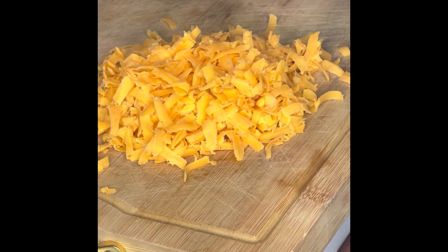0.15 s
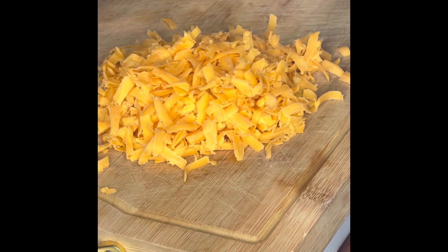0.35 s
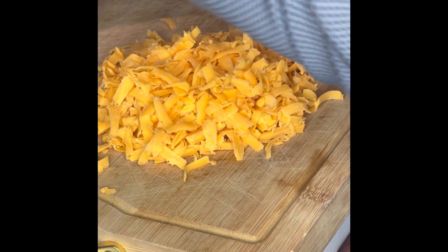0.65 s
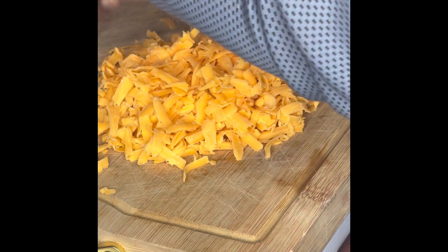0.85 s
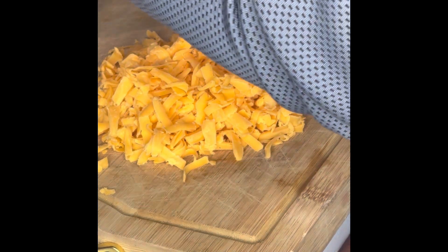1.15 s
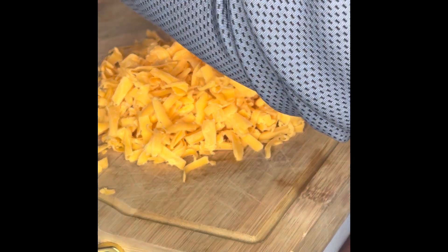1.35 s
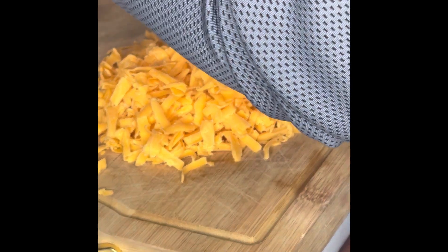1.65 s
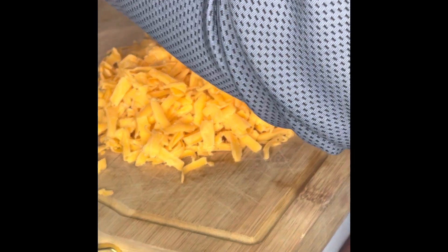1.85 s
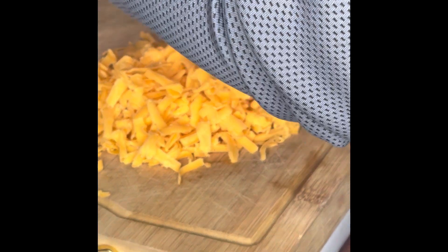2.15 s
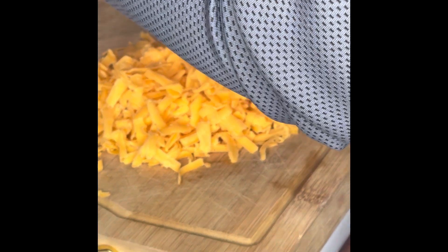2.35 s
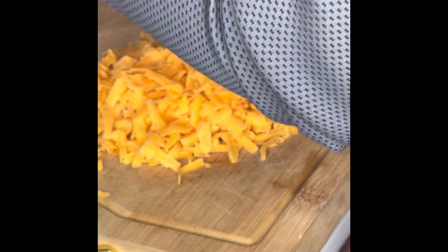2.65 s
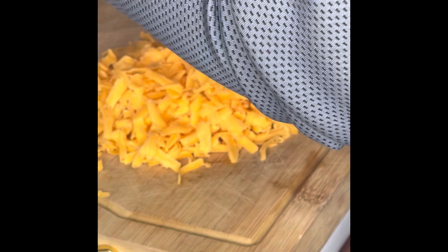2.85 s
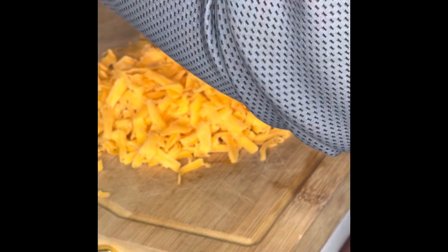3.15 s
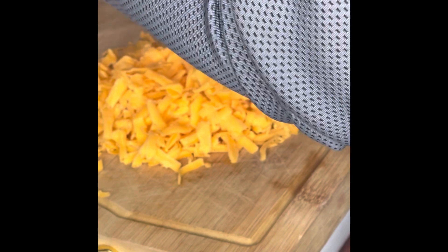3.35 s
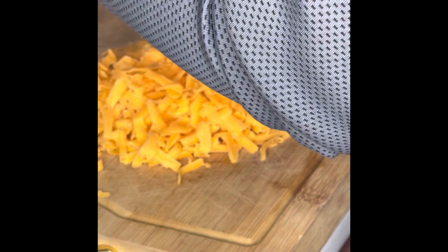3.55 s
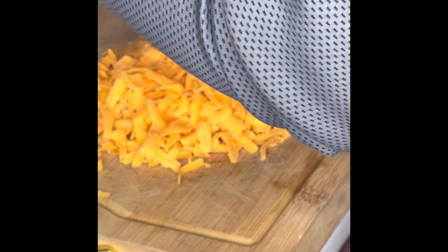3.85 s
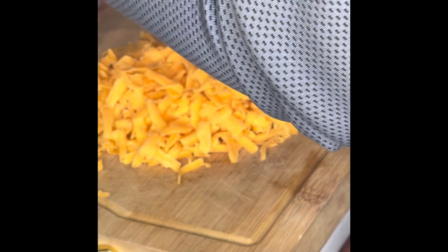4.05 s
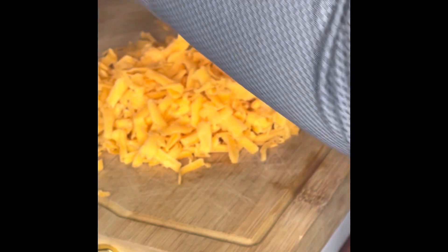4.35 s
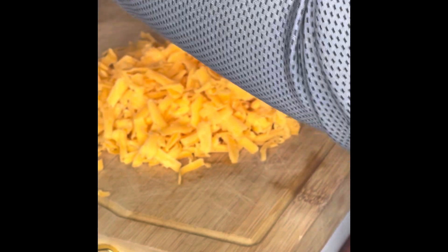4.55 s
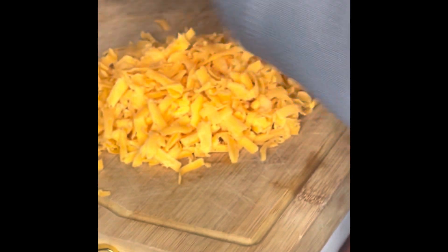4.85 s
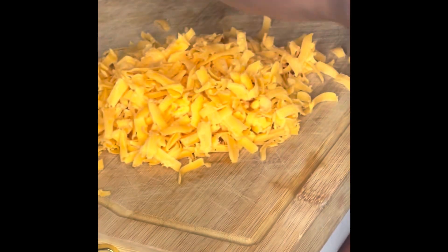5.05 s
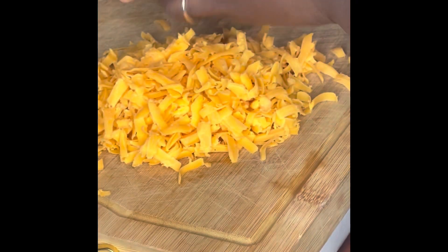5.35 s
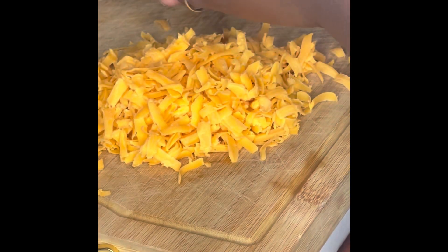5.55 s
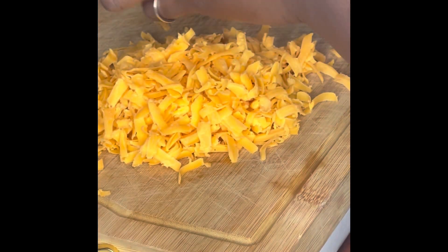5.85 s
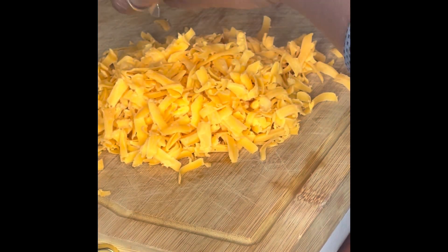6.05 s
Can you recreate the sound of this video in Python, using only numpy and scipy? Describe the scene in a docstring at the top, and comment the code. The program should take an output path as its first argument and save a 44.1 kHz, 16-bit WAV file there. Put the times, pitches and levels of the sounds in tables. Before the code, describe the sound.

Irregular dry scraping from a handheld metal grater, made of dense tearing grains and sharp little cracks. It starts busy, falls to sparse light ticks with dull board thumps around two seconds, picks up after four, and finishes with rapid bright rasps. Close phone microphone, centred direct sound, short diffuse kitchen echo to the sides, quiet low hum behind.

```python
"""Dense rasping grains and sharp snaps: cheese is pushed over a hand grater close to a phone.
Grains are band noise in random bursts under stroke envelopes; snaps are short cracks with a ring.
Taps on the hollow grater and knocks on the wooden board ring decaying modes. Behind them a low rumble
wavers and a fridge hums (wavering tones and shaped noise); the small kitchen adds a noise echo."""
import sys
import numpy as np
from scipy import signal
from scipy.fft import rfft, irfft, next_fast_len
from scipy.io import wavfile
from scipy.ndimage import uniform_filter1d

SR = 44100
rng = np.random.default_rng(int(sys.argv[2]) if len(sys.argv) > 2 else 0)


def materialize(psi):
    """Save the field psi as 16-bit PCM at rate SR to the path in sys.argv[1].

    A 1-D psi becomes a single channel; in a 2-D psi each row is a channel.
    """
    bounded = np.clip(np.atleast_2d(psi).T, -1, 1)
    quanta = np.round(bounded * 32767).astype(np.int16)
    wavfile.write(sys.argv[1], SR, quanta)


N = 273861

# strokes over the teeth: start t/s, length/s, level/dB, growth over the stroke/dB,
# body re level/dB, edge re level/dB
STROKES = [(-0.01, 0.12, -29.5, -11, -7.5, -3), (0.127, 0.37, -41, -13, -3, 1),
           (0.584, 0.15, -52.5, 9.5, -4, -9), (0.681, 0.047, -43, 2, -3.5, 2),
           (0.764, 0.26, -40.5, 1, -6, 3.5), (1.147, 0.061, -49.5, 4, -9, 1),
           (1.226, 0.14, -56.5, 2.5, 0, 13.5), (1.415, 0.018, -50.5, -4, -12, 8),
           (1.577, 0.032, -55, 1, -5.5, -6), (1.709, 0.036, -50.5, -26, 11.5, -8),
           (1.925, 0.037, -53, 10, 3.5, -2.5), (2.093, 0.066, -53.5, -5, 1, 0),
           (2.327, 0.025, -42, -4.5, -12.5, 6), (2.477, 0.073, -70, 5, 7, -4),
           (2.652, 0.079, -55.5, 5.5, -10, 2), (2.782, 0.054, -56, -5, -9, -9),
           (2.867, 0.024, -50.5, -5, -17, 5.5), (3.087, 0.1, -46, -12.5, -1.5, 5),
           (3.249, 0.06, -48, 4, -8.5, -8), (3.459, 0.036, -52, 11, -25, 1.5),
           (3.688, 0.14, -49.5, -9.5, -7, -10), (3.84, 0.077, -65.5, 5, -6, 7),
           (3.972, 0.19, -45, 3, -8, -1), (4.294, 0.095, -45, 7, -69, -5.5),
           (4.428, 0.26, -38.5, -28.5, -2.5, 3), (4.636, 0.14, -49.5, 4, -3, 3.5),
           (4.838, 0.059, -50.5, 0, -4, 6), (4.959, 0.09, -39.5, -7, -7, -0.5),
           (5.067, 0.13, -49.5, -9, 1, 1), (5.199, 0.23, -35.5, -12, -5.5, -5),
           (5.404, 0.3, -48, -6.5, -3, -18), (5.596, 0.14, -53.5, 16, -5.5, -1),
           (5.739, 0.049, -37, 8, -3.5, 2.5), (5.784, 0.089, -35, -4, -1, 2),
           (5.9, 0.031, -28.5, -11.5, -1.5, 3), (5.977, 0.031, -32.5, -5.5, -3.5, 3),
           (6.129, 0.13, -39.5, 5, -10, -2)]
BITE_S, RELEASE_DB_PER_S = 0.0054, 186  # quick bite, slower release
TICKS_DB, TICK_EDGE = -11, 0.99  # ticks re stroke level; share of the edge column they follow

# loudest snaps of the teeth: t/s, nominal peak level/dB, ring f/Hz, edge re ring/dB
SNAPS = [(0.0176, -17, 2960, -17), (0.035, -28, 2620, 1), (0.0574, -22.5, 3720, 8),
         (0.137, -17.5, 2370, 5.5), (0.1836, -26.5, 1980, -8), (0.219, -28, 5600, -1),
         (0.2345, -25, 2220, -6), (0.265, -19.5, 5630, 12), (0.2685, -17, 2890, 1.5),
         (0.2984, -25, 2110, -3), (0.313, -19, 2160, 6), (0.336, -14.5, 3700, 2.5),
         (0.369, -17.5, 3900, 13), (0.397, -24.5, 3400, 4), (0.4068, -24, 2280, 9), (0.595, -33, 2520, 2),
         (0.6077, -27, 3287, 14), (0.6406, -23.5, 2740, 1.5), (0.671, -29, 3020, 17),
         (0.686, -27.5, 2550, 9), (0.6965, -34, 3000, 12), (0.731, -26.5, 3600, -6), (0.773, -29, 2180, 7),
         (0.8112, -30, 3330, 3), (0.851, -25, 3600, -5), (0.8561, -15, 2380, 14), (0.865, -37, 2190, -34),
         (0.9, -22, 2450, 14), (0.9114, -18, 2370, 9), (0.917, -23, 5430, 10), (0.982, -34, 2900, 6),
         (1.0157, -12.5, 2160, 12), (1.039, -22, 5600, 7), (1.1742, -28, 4200, -10), (1.235, -27, 2280, 11),
         (1.33, -34, 5060, 10), (1.42, -22, 2970, 8.5), (1.5986, -31.5, 2420, 9), (1.7118, -26, 1960, 6.5),
         (1.736, -30, 3050, 17), (1.764, -18, 6140, 7.5), (1.921, -31, 5250, 4), (1.933, -31, 4500, 14),
         (1.948, -22.5, 3370, 28), (2.086, -31.5, 2020, 9), (2.1037, -22, 4900, 3), (2.115, -36, 3000, 7),
         (2.132, -30, 2560, 3), (2.197, -34.5, 1960, -3), (2.3301, -17.5, 4400, 11),
         (2.394, -32.5, 3550, 3), (2.498, -21.5, 5300, -2), (2.526, -23.5, 5200, -6),
         (2.552, -24.5, 2190, 12), (2.661, -25.5, 4660, 19), (2.693, -18, 1780, 14), (2.724, -26, 5700, -9),
         (2.7927, -29.5, 5200, -4), (2.877, -23.5, 5500, -2), (2.911, -31.5, 3530, 1),
         (2.9203, -26.5, 5600, -2), (3.0787, -33.5, 2980, -4), (3.0861, -17, 1850, 18.5),
         (3.134, -17, 3320, 5), (3.248, -26.5, 4530, -1.5), (3.2748, -24, 4650, -1),
         (3.436, -29.5, 3340, -8), (3.445, -25, 3280, 5), (3.463, -13, 2790, 3.5),
         (3.6337, -25.5, 4040, -2), (3.654, -39, 1490, -2), (3.686, -18.5, 2290, 3.5),
         (3.707, -30, 4100, -15), (3.817, -36.5, 2080, -2), (3.8366, -24.5, 5000, 4),
         (3.9876, -27, 2160, 4), (4.055, -29.5, 2520, 22), (4.0885, -23, 2420, 2.5),
         (4.165, -25.5, 3000, 13), (4.305, -23, 3500, -4.5), (4.35, -27.5, 4524, 0),
         (4.436, -16.5, 3150, 9), (4.516, -24, 4520, 30), (4.538, -21.5, 2260, 13), (4.71, -34, 3730, -7),
         (4.8768, -24, 5000, 5), (4.9573, -35, 1920, -8), (4.97, -23.5, 1990, -5),
         (4.9915, -22.5, 1640, -9), (5.007, -27, 3540, -2), (5.029, -28.5, 2060, 2),
         (5.091, -28.5, 4120, 2), (5.104, -29, 1450, -5), (5.176, -21.5, 1540, -27), (5.214, -17, 1610, 26),
         (5.2885, -20, 1670, 1), (5.302, -21, 2380, -3), (5.343, -17, 2700, 1.5), (5.346, -18, 2000, 10),
         (5.437, -28, 2570, 5), (5.505, -29, 2440, 0.5), (5.5523, -22.5, 3820, 1),
         (5.6067, -29.5, 3000, 15), (5.627, -27.5, 5500, 11), (5.634, -22, 2200, 5),
         (5.6669, -32, 2180, -1), (5.695, -16.5, 3350, 5.5), (5.713, -29, 3000, 4),
         (5.7213, -19.5, 2800, 3), (5.737, -39, 3000, 3), (5.7576, -20, 2400, -8), (5.7778, -18, 2300, 8),
         (5.7888, -16, 4200, -15), (5.825, -18, 2200, 16), (5.834, -25, 2520, 5), (5.846, -24, 4000, 9),
         (5.8584, -15, 1830, 3), (5.905, -22, 3200, 15), (5.915, -14, 3560, 0.5),
         (5.9675, -18.5, 4580, -14), (5.9981, -15.5, 2210, 9), (6.0508, -21.5, 4230, 17),
         (6.1287, -23.5, 2320, 10), (6.1757, -17, 3580, 11)]
SNAP_SIZE = 2048  # samples
SNAP_BODY_DB = -7.5  # broad body re ring
CREST_DB = 20  # nominal peak over rms of one snap
CRACK_S, RATTLE_S, RATTLE_DB = 0.001, 0.005, -12  # decay times; rattle re crack
STRIKE = 0.83  # first impulse re the noise that follows

SHEET_HZ, SHEET_WIDTH_HZ, SHEET_DB = 2395, 380, -11.5  # broad ring of the perforated sheet

# taps on the hollow grater: t/s, peak level/dB, contact length/s, brightness/(dB per octave)
TAPS = [(2.715, -36.5, 0.0029, -3.5), (4.02, -36.5, 0.0099, 2), (4.055, -32, 0.0049, 3.5),
        (4.435, -33, 0.032, 29), (4.912, -29.5, 0.0026, -2), (4.988, -27.5, 0.0044, 2.5),
        (5.09, -37, 0.11, 6), (5.145, -28.5, 0.018, 2), (5.162, -24, 0.0032, -1), (5.178, -21.5, 0.0039, 0),
        (5.208, -19.5, 0.004, 4), (5.265, -25.5, 0.0092, 3), (5.29, -35, 0.13, 13),
        (5.915, -19, 0.00058, 2.5), (5.998, -23, 0.0019, 0.5), (6.175, -31.5, 0.0038, 0.5)]
# modes of the hollow grater: f/Hz, relative level/dB, t60 without contact/s
GRATER_MODES = [(309, 3, 0.022), (594, 7, 0.0126), (688, 4.5, 0.0093), (804, -4, 0.0041),
                (1420, -13, 0.012), (1618, -4.5, 0.022), (1943, -10.5, 0.016), (2247, -9, 0.034)]
PITCH_SPREAD, TAP_ECHO_DB = 0.0516, -3.5  # random relative pitch spread from tap to tap; gain into echo

# knocks on the board: t/s, peak level/dB, contact length/s, brightness/(dB per octave)
KNOCKS = [(.665, -31, 0.15, 9), (.695, -19.5, 0.0021, -8.5), (1.24, -31.5, 0.052, -7),
          (1.956, -18, 0.053, 3.5), (1.98, -16, 0.009, -3.5), (2.395, -35.5, 0.16, -15),
          (3.185, -24.5, 0.0051, -12), (4.164, -20.5, 0.031, 6.5), (4.19, -26.5, 0.0037, -10),
          (4.538, -27, 0.11, 7.5), (4.612, -20.5, 0.033, 7.5), (4.632, -26, 0.0055, -3.5),
          (4.7, -27.5, 0.025, 2)]
# modes of board and counter: f/Hz, relative level/dB, t60 without contact/s
BOARD_MODES = [(54.75, -6, 0.55), (80, 7.5, 0.2), (115.3, 3.5, 0.26), (159.6, 0.5, 0.24), (200, 6, 0.044),
               (246.4, -3, 0.42), (279.4, -3, 0.37), (304, -7.5, 0.54), (358.8, -0.5, 0.063),
               (431, -8.5, 0.24), (508.7, -11, 0.12), (571, -19.5, 0.47), (705.4, -16.5, 0.075),
               (854, -27.5, 0.03), (966, -25.5, 0.025)]
BEND_LAG_S, BEND_POWER = 0.011, 0.78  # bending-wave build-up time at 100 Hz; its fall with pitch

# low rumble envelope: t/s, level/dB
RUMBLE = [(0.0, -40), (0.33, -64), (0.85, -34.5), (1.04, -47.5), (1.25, -42), (1.59, -51), (1.8, -43),
          (2.44, -42.5), (2.6, -49), (3.15, -45), (3.3, -64), (3.58, -39.5), (3.8, -42), (3.95, -48),
          (4.7, -53), (4.84, -61), (4.95, -40), (5.2, -48), (5.73, -50), (6.21, -78)]
# fridge hum: f/Hz, pitch waver/Hz, level/dB
HUM = [(59, 2, -53), (212, 3.5, -55.5), (315, 25, -68)]
# room noise spectrum: f/Hz, relative level/dB
ROOM_SPECTRUM = [(12, -22), (20, -21), (70, 7.5), (152, -3.5), (216, 0), (721, -17.5), (2400, -26),
                 (4850, -24.5), (5630, -24.5), (8000, -29), (10400, -34), (17600, -120)]
ROOM_DB = -48.5  # rms of the room noise ahead of the tone colour

KITCHEN_T60_S, KITCHEN_DB = 0.3, -6.5
KITCHEN_GAP_S, KITCHEN_SWELL_S = 0.0024, 0.0009  # late start; build-up time
KITCHEN_DULL_HZ = 7560  # above this the echo dies twice as fast

# overall tone colour: f/Hz, gain/dB
TONE_COLOUR = [(20, -32), (45, -3.5), (6000, -2), (9500, 2.5), (10600, 8), (11300, 1), (12500, -9),
               (14000, -30), (16000, -49)]
# phase between the two ports: f/Hz, left lead/rad
PORT_PHASE = [(0, 0), (400, 0), (700, -.6), (1100, -.4), (1700, 0), (2000, .05), (2600, .5), (3800, .65),
              (4300, 1.05), (4850, 3.14), (5300, 5.2), (5700, 6.2), (6100, 6.35), (7000, 7.4), (8500, 9.1),
              (9100, 9.42), (9600, 9.5), (11500, 11.7), (12000, 12.5), (16000, 12.6)]
# level between the two ports: f/Hz, left minus right/dB
PORT_LEAN = [(60, 0), (110, 1), (200, 2.5), (380, 6), (700, 2), (1290, 0), (2380, 0.0), (4400, 0),
             (8120, 1), (15000, -0.5)]
# width of the side sound: f/Hz, side gain/dB
SIDE_GAIN = [(100, -62), (400, 0.5), (800, 3), (1800, -15.5), (4000, -7), (4850, -3.5), (5300, 0),
             (6000, -20), (7500, -27), (9100, -15), (11500, -4), (13000, -14)]
TOP_HZ = 15800  # low-pass edge


def undb(db):
    """dB to amplitude."""
    return 10 ** (np.asarray(db) / 20)


def unit(x):
    """Scale to rms 1."""
    return x / np.sqrt(np.mean(x ** 2))


def over_hz(table, hz):
    """A table read on a log-frequency axis."""
    points, values = np.transpose(table)
    return np.interp(np.log(hz + 1), np.log(points + 1), values)


def band(x, lo_hz, hi_hz):
    """Band-pass."""
    sos = signal.butter(2, [lo_hz, hi_hz], "bandpass", fs=SR, output="sos")
    return signal.sosfilt(sos, x)


def fade(x, tau_s):
    """Each impulse dies away exponentially."""
    return signal.lfilter([1], [1, -np.exp(-1 / (tau_s * SR))], x)


def walk(rate_hz):
    """Random levels held 1 / rate_hz and slewed twice."""
    hold = int(SR / rate_hz)
    steps = np.repeat(rng.standard_normal(N // hold + 1), hold)
    return 1.2 * uniform_filter1d(uniform_filter1d(steps, hold), hold)[:N]


def grains(rate_hz, spread_db):
    """Impulses at random moments, a few much larger than the rest."""
    hits = rng.random(N) < rate_hz / SR
    return hits * undb(spread_db * np.minimum(rng.exponential(size=N), 4))


def rasp():
    """Teeth tear the cheese in short bursts; each band shares some bursts and has many of its own."""
    shared = grains(rate_hz=84.0, spread_db=4.0)
    clumps_db = 2.8 * walk(35.0)  # all teeth catch in uneven clumps
    out = 0
    for hz in 800 * 1.48 ** np.arange(7):
        body = np.clip(np.log2(2000 / hz), 0, 1)
        edge = np.clip(np.log2(hz / 3000), 0, 1)
        hits = shared + 1.2 * grains(rate_hz=90.0, spread_db=4.5)
        bursts = fade(hits, 2.5 / hz + 0.0004) + 0.1  # low bursts last longer
        flicker_db = -6.0 + clumps_db + 1.05 * walk(24.99)
        noise = band(rng.standard_normal(N), hz, hz * 1.88)
        out = out + strokes(body, edge) * undb(flicker_db) * unit(bursts * noise)
    # small shreds let go at random
    ticks = fade(grains(rate_hz=110.0, spread_db=3.0), 0.0012) * rng.standard_normal(N)
    return out + undb(TICKS_DB) * strokes(0, TICK_EDGE) * unit(band(ticks, 1600, 10000))


def strokes(body, edge):
    """Pressure of all strokes in one band: bite, growth while the stroke lasts, release."""
    t, power = np.arange(N) / SR, np.zeros(N)
    for start_s, length_s, db, growth_db, body_db, edge_db in STROKES:
        i = max(int(start_s * SR), 0)
        u = t[i:int((start_s + length_s + 0.5) * SR)] - start_s
        db = db + body * body_db + edge * edge_db + growth_db * np.minimum(u / length_s, 1)
        release_db = RELEASE_DB_PER_S * np.maximum(u - length_s, 0)
        gain = np.minimum(u / BITE_S, 1) * undb(db - release_db)
        power[i:i + len(u)] += gain ** 2
    return np.sqrt(power)


def snaps():
    """A shred lets go: a crack of about a millisecond and a short rattle of the sheet metal."""
    out = np.zeros(N + SNAP_SIZE)
    t = np.arange(SNAP_SIZE) / SR
    shape = np.exp(-t / CRACK_S) + undb(RATTLE_DB) * np.exp(-t / RATTLE_S)
    noise = rng.standard_normal((len(SNAPS), 3, SNAP_SIZE)) * shape
    noise[:, :2, 0] = STRIKE * np.sqrt(CRACK_S * SR)  # body and ring only
    bodies = band(noise[:, 0], 330, 2800)
    edges = band(noise[:, 2], 4520, 10520)
    for (start_s, db, hz, edge_db), body, core, edge in zip(SNAPS, bodies, noise[:, 1], edges):
        ring = band(core, hz / 1.144, hz * 1.156)
        gains = undb([SNAP_BODY_DB, 0, edge_db])
        mix = sum(gain * unit(part) for gain, part in zip(gains, (body, ring, edge)))
        snap = mix / np.linalg.norm(gains)
        i = int(start_s * SR)
        out[i:i + SNAP_SIZE] += undb(db - CREST_DB) * snap
    return out[:N]


def sheet_ring(teeth):
    """The perforated sheet answers the teeth with one broad resonance."""
    half_hz = SHEET_WIDTH_HZ / 2
    return undb(SHEET_DB) * band(teeth, SHEET_HZ - half_hz, SHEET_HZ + half_hz)


def blows(events, modes, pitch_spread):
    """A blow rings decaying modes; a long rough contact draws out the low ones, a soft one favours them."""
    out = np.zeros(N + SR)
    t = np.arange(SR // 2) / SR
    chance = rng.standard_normal((len(events), len(modes), 64))
    walk_t = np.linspace(0, 0.5, 64)
    for (start_s, db, contact_s, tilt_db), draws in zip(events, chance):
        blow = 0
        for (hz, mode_db, t60_s), draw in zip(modes, draws):
            hz = hz * (1 + pitch_spread * draws[0, -1])
            swell = 1 - np.exp(-(t / BEND_LAG_S * (hz / 100) ** BEND_POWER) ** 2)
            octaves = np.log2(hz / modes[0][0])
            tau_s = t60_s / np.log(1000) + contact_s * 0.75 ** octaves
            # a random phase walk roughens each mode, more so in the treble
            phase_walk = 0.33 * octaves * np.interp(t, walk_t, np.cumsum(draw))
            tone = np.sin(2 * np.pi * hz * t + 2 * np.pi * draw[0] + phase_walk)
            blow = blow + undb(mode_db + tilt_db * octaves) * swell * np.exp(-t / tau_s) * tone
        i = int(start_s * SR)
        out[i:i + len(t)] += undb(db) * blow / np.abs(blow).max()
    return out[:N]


def rumble():
    """A low wavering tone near 60 Hz over broader shudder, on its own level curve."""
    shudder = unit(band(rng.standard_normal(N), 28, 89))
    tone = waver(60.5, 2.5, flutter_db=2.5)
    t_s, level_db = np.transpose(RUMBLE)
    envelope_db = np.interp(np.arange(N) / SR, t_s, level_db)
    return undb(envelope_db) * (0.53 * tone + 0.38 * shudder)


def waver(hz, waver_hz, flutter_db):
    """A tone of rms near 1 whose pitch and level wander."""
    phase = 2 * np.pi * np.cumsum(hz + waver_hz * walk(14.0)) / SR
    return np.sqrt(2) * undb(flutter_db * walk(8.2)) * np.sin(phase)


def fridge():
    """Wavering hum tones over faint shaped room noise."""
    hz = np.fft.rfftfreq(N, 1 / SR)
    spectrum = rfft(rng.standard_normal(N)) * undb(over_hz(ROOM_SPECTRUM, hz))
    air = unit(irfft(spectrum, N))
    hum = sum(undb(db) * waver(f_hz, w_hz, flutter_db=2.0) for f_hz, w_hz, db in HUM)
    return undb(ROOM_DB) * air + hum


def kitchen(x):
    """Diffuse echo (mid, side) of fading noise, redrawn each hop so that it keeps no fixed tones."""
    hop, size = 2048, 16384
    u = np.maximum(np.arange(size) / SR - KITCHEN_GAP_S, 0)
    fall = undb(-60 * u / KITCHEN_T60_S)
    swell = 1 - np.exp(-u / KITCHEN_SWELL_S)
    soft = signal.butter(2, KITCHEN_DULL_HZ, fs=SR, output="sos")
    x = band(x, 240, 20000)
    out = np.zeros((2, N + size + 2 * hop))
    for i in range(0, N, hop):
        noise = rng.standard_normal((2, size))
        dull = signal.sosfilt(soft, noise)
        response = (dull * fall + (noise - dull) * fall ** 2) * swell
        piece = x[None, i:i + hop] / np.linalg.norm(response, axis=1, keepdims=True)
        echo = signal.fftconvolve(piece, response, axes=1)
        out[:, i:i + echo.shape[1]] += echo
    return undb(KITCHEN_DB) * out[:, :N]


def scene():
    """Grater, board, rumble and hum sit in the middle; the echo also comes from the sides."""
    teeth = rasp() + snaps()
    grater = teeth + sheet_ring(teeth)
    taps = blows(TAPS, GRATER_MODES, PITCH_SPREAD)
    knocks = blows(KNOCKS, BOARD_MODES, 0)
    mid, side = kitchen(grater + undb(TAP_ECHO_DB) * taps)
    mid = mid + grater + taps + knocks + rumble() + fridge()
    return np.array([mid + side, mid - side])


def record(dry):
    """Two close ports with phase and level offsets, side gain by pitch; a treble peak, dull above 12 kHz."""
    size = next_fast_len(N + SR)
    hz = np.fft.rfftfreq(size, 1 / SR)
    sign = np.array([[1], [-1]])  # left, right
    left, right = rfft(dry, size)
    mid, side = (left + right) / 2, (left - right) / 2
    field = mid + sign * undb(over_hz(SIDE_GAIN, hz)) * side
    points_hz, lead_rad = np.transpose(PORT_PHASE)
    phase = np.exp(0.5j * sign * np.interp(hz, points_hz, lead_rad))
    lean = undb(sign * over_hz(PORT_LEAN, hz) / 2)
    wet = irfft(field * phase * lean * undb(over_hz(TONE_COLOUR, hz)), size)[:, :N]
    return signal.sosfilt(signal.ellip(8, 0.2, 70, TOP_HZ, fs=SR, output="sos"), wet)


dry = scene()
out = record(dry)
materialize(out)
```